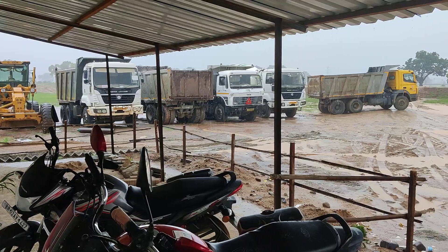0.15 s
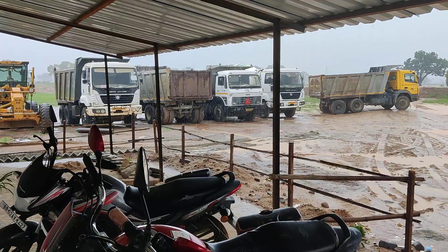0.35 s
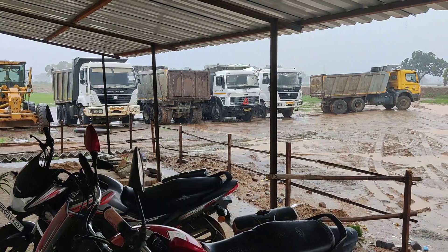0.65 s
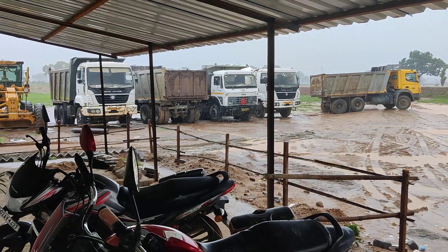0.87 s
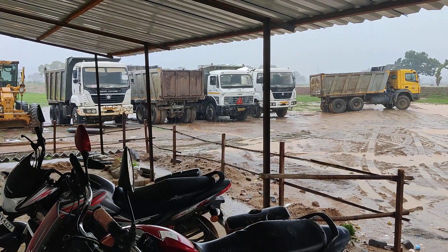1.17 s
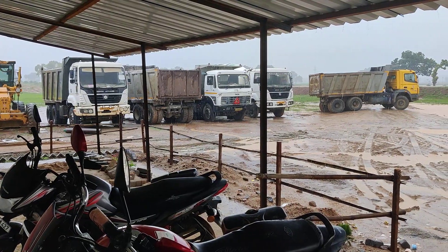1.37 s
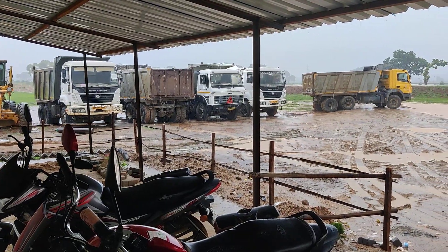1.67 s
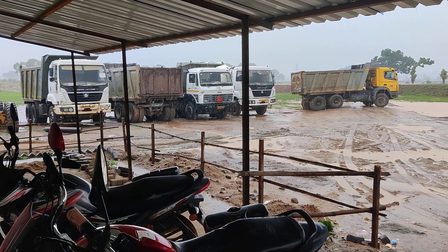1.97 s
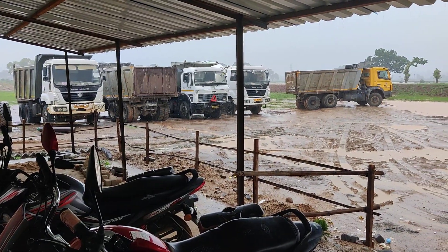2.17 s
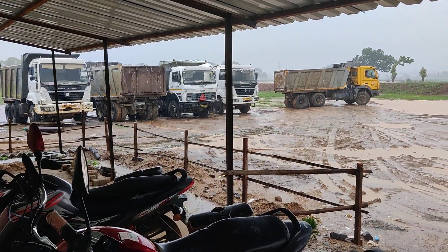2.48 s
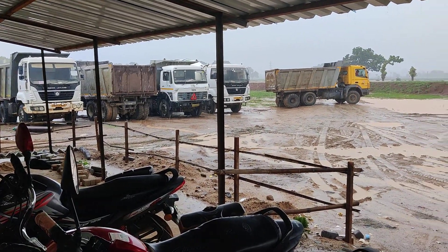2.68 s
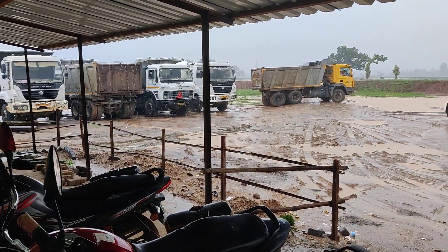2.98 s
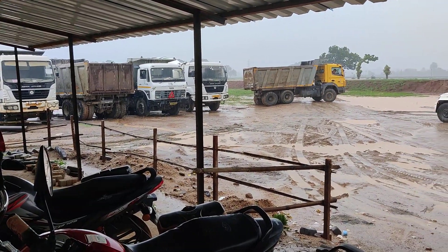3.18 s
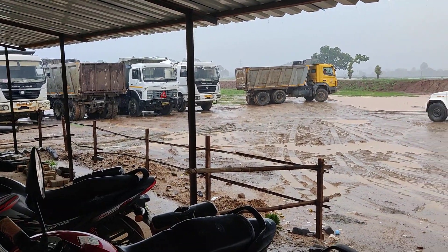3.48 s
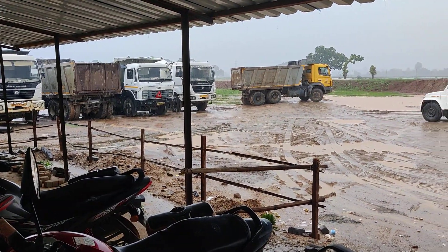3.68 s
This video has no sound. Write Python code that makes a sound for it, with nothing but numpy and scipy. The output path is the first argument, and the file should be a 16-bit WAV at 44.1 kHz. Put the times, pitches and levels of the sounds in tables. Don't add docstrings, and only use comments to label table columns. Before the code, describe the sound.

Steady rain fades in over the first half second, with a soft low thump near 0.35, then drums on a metal shed roof and hisses across a muddy yard. A distant diesel drones low, shifts to a lower pitch around 0.8-1.1, holds, then coasts down and fades from 2.4 to 4, beside a faint idling engine and rumble. Close drops tick and fizz, clearest around 1.4-1.6. Wide phone stereo.

```python
import sys
import numpy as np
from scipy import signal
from scipy.fft import rfft, irfft
from scipy.io import wavfile
from scipy.ndimage import uniform_filter1d

SR = 44100
rng = np.random.default_rng(int(sys.argv[2]) if len(sys.argv) > 2 else 0)


def unload_wav(signal):
    wavfile.write(
        sys.argv[1],
        SR,
        np.round(np.clip(np.atleast_2d(signal).T, -1, 1) * 32767).astype(np.int16),
    )


def elevation(decibels):
    levels = np.asarray(decibels, float)
    return 10 ** (levels / 20)


N = 169344
OPPOSED = np.array([[1], [-1]])


def level(x, db):
    return x * elevation(db) / np.sqrt(np.mean(x ** 2))


def along(table, hz):
    table = np.array(table, float)
    return np.interp(np.log(np.maximum(hz, 1)), np.log(table[:, 0]), table[:, 1])


def walk(rate_hz):
    hold = int(SR / rate_hz)
    steps = np.repeat(rng.standard_normal(N // hold + 1), hold)
    return 1.155 * uniform_filter1d(uniform_filter1d(steps, hold), hold)[:N]


def patter():
    drops_per_s, spread_db, tail_s, burst_share = 2500, 2, 0.0025, 0.58
    size = np.minimum(rng.exponential(size=N), 2.5)
    hit = (rng.random(N) < drops_per_s / SR) * elevation(spread_db * size)
    burst = signal.lfilter([1], [1, -np.exp(-1 / (tail_s * SR))], hit ** 2)
    power = 1 - burst_share + burst_share * burst / burst.mean()
    return rng.standard_normal(N) * np.sqrt(power)


def rain():
    # (frequency [Hz], density [dB per Hz])
    wash = [(200, -4), (640, -6.5), (2000, -2), (4000, -9.5), (4500, -13.5), (6800, -14), (7500, -19.5),
            (15700, -24.5)]
    # (frequency [Hz], width [Hz], gain [dB])
    left_peaks = [(452, 150, 6.5), (766, 50, 6), (1040, 270, 5), (1760, 810, 3.5), (2390, 1100, -2.5),
                  (3410, 590, 3.5), (5000, 950, 4), (6500, 1000, 1.5)]
    right_peaks = [(434, 120, 4.5), (756, 30, 6.5), (1040, 330, 3.6), (1856, 120, 2.6), (2634, 280, 3.7),
                   (3360, 160, 4.2), (4000, 160, 2.7), (6300, 1200, 0.85), (13200, 3000, 1.8)]
    # (frequency [Hz], correlation [-1..1])
    likeness = [(60, 0.99), (130, 0.5), (290, 1), (640, 0.61), (1410, -0.17), (3100, 0.03), (6820, -0.0),
                (15000, -0.18)]
    # (frequency [Hz], level difference [dB])
    tilt = [(60, 1.5), (110, 1.5), (200, 2.5), (380, -1.5), (700, 1.0), (1290, -3.5), (2380, -3.5),
            (4400, -5.5), (8120, 1), (15000, -2)]
    rain_db, swell_db, flicker_db = -26.5, 0.49, 1.03

    hz = np.fft.rfftfreq(N, 1 / SR)
    like = along(likeness, hz)
    mid = rfft(patter()) * np.sqrt(1 + like)
    side = rfft(patter()) * np.sqrt(1 - like)
    low_cut_db = 30 * np.clip(np.log2(200 / np.maximum(hz, 1)), 0, 3)
    colour_db = along(wash, hz) - low_cut_db
    pair = []
    for sign, peaks in ((0.96, left_peaks), (-1.067, right_peaks)):
        bumps_db = sum(db / (1 + (2 * (hz - f) / w) ** 2) for f, w, db in peaks)
        gain_db = colour_db + bumps_db + sign * along(tilt, hz) / 2
        pair.append((mid + sign * side) * elevation(gain_db))
    pair = np.array(pair)

    out = 0
    swell = swell_db * walk(2.04)
    octave = np.log2(np.maximum(hz, 1) / 125)
    for k in range(8):
        band = np.cos(np.pi / 2 * np.clip(octave - k, -1, 1)) ** 2
        flicker = flicker_db * k / 7 * walk(13)
        out = out + irfft(pair * band, N) * elevation(swell + flicker)
    return level(out, rain_db)


def truck():
    # (time [s], firing rate [Hz], second-order level [dB], first-order level [dB])
    drive = [(.1, 50.4, -23, -24), (.33, 50.51, -20.5, -22), (.55, 50.35, -22.5, -26),
             (.76, 50.63, -22, -30), (.85, 47.8, -40, -32), (.98, 44.8, -37, -28.5),
             (1.1, 45.3, -23, -26.5), (1.4, 44.84, -26, -26.5), (1.7, 44.35, -26.5, -28.5),
             (1.981, 44.37, -24.5, -26), (2.3, 44.08, -27, -28.5), (2.45, 41.56, -38, -36),
             (2.75, 35.98, -30.5, -40), (3.05, 32.31, -38, -49), (3.298, 28.97, -33, -44),
             (3.6, 24.42, -36, -42), (3.84, 22.5, -39, -46)]
    # (multiple of firing rate, level [dB])
    upper_orders = [(1.5, -42.5), (3, -41), (3.5, -49.5), (4, -51.5), (5, -60)]
    scatter_db, patchy_db, pitch_wobble = 1, 2, .002
    coast_s, coast_db = 2.3, 3

    t = np.arange(N) / SR
    time_s, firing_hz, second_db, first_db = np.array(drive).T
    rate_hz = np.interp(t, time_s, firing_hz) * (1 + pitch_wobble * walk(5.52))
    phase = 2 * np.pi * np.cumsum(rate_hz) / SR

    def order(multiple, db):
        tone = np.cos(multiple * phase + 2 * np.pi * rng.random())
        return np.sqrt(2) * elevation(db + scatter_db * walk(20)) * tone

    out = order(2, np.interp(t, time_s, second_db)) + order(1, np.interp(t, time_s, first_db))
    coast = coast_db * np.clip((t - coast_s) / 0.32, 0, 1)
    for multiple, db in upper_orders:
        out = out + order(multiple, db + patchy_db * walk(5.94) + coast)
    return out


def idling_engine():
    # (multiple of idle rate, level re fundamental [dB])
    idle_orders = [(1, -1), (2.3, -5), (5.6, -12.5), (8.3, -16)]
    idle_hz, idle_db, scatter_db = 30.45, -38, 1
    phase = 2 * np.pi * np.cumsum(idle_hz * (1 + .01 * walk(3))) / SR
    out = 0
    for multiple, db in idle_orders:
        order_db = idle_db + db + 3 * walk(5.06) + scatter_db * walk(20)
        tone = np.cos(multiple * phase + 2 * np.pi * rng.random())
        out = out + np.sqrt(2) * elevation(order_db) * tone
    return out


def rumble():
    # (frequency [Hz], density [dB per Hz])
    rumble_spectrum = [(5, -8), (15, -8), (30, -3.5), (60, -1.5), (100, 0), (175, -3.5), (210, -18),
                       (400, -37.5)]
    hz = np.fft.rfftfreq(N, 1 / SR)
    air = irfft(rfft(rng.standard_normal((2, N))) * elevation(along(rumble_spectrum, hz)), N)
    return level(air[0] + 0.09 * air[1] * OPPOSED, -34.5)


def engines():
    pan_db = 1.9
    return (truck() + idling_engine() + rumble()) * elevation(OPPOSED * pan_db / 2)


def splashes():
    # (time [s], peak [dB], lowest [Hz], highest [Hz], tail [s])
    drops = [(.269, -25.5, 5500, 12500, 0.018), (.456, -30, 12000, 16000, .01),
             (0.464, -27, 12000, 16000, .006), (.472, -31, 11500, 16000, .008),
             (.650, -27, 8500, 16000, 0.0022), (.653, -25, 11000, 16000, 0.01),
             (1.194, -29, 8000, 16000, 0.01), (1.359, -30, 5510, 12000, .01),
             (1.42, -20, 3500, 7000, 0.011), (1.487, -29, 5000, 14000, 0.015),
             (1.607, -22, 5990, 16000, .0015), (1.6094, -22, 8000, 16000, .0015),
             (1.612, -22, 4500, 15900, 0.027), (1.62, -34, 8500, 9100, .04), (1.66, -30, 9000, 16000, .02),
             (2.428, -23, 4500, 7500, .01), (2.83, -29, 8000, 15000, .008), (2.92, -30, 9000, 16000, 0.012),
             (2.961, -29, 4494, 8500, 0.022), (3.11, -39, 8000, 14000, .015),
             (3.352, -33, 7950, 16000, .03), (3.5, -29, 7000, 13000, .015),
             (3.592, -31, 9000, 16000, 0.039), (3.63, -31, 10980, 16000, 0.13)]
    click_db, click_s, crackle_db, hold = -4, .0006, 2.5, 64
    out = np.zeros((2, N))
    t = np.arange(int(.3 * SR)) / SR
    for time_s, peak_db, low_hz, high_hz, tail_s in drops:
        shape = np.exp(-t / tail_s) + elevation(click_db) * np.exp(-t / click_s)
        grains = np.repeat(rng.standard_normal(len(t) // hold + 1), hold)[:len(t)]
        crackle = elevation(crackle_db * (grains - .6))
        noise = rng.standard_normal((2, len(t))) * shape * crackle
        band = signal.butter(2, [low_hz, high_hz], "band", fs=SR, output="sos")
        fizz = signal.sosfilt(band, noise) * elevation(peak_db - 3)
        i = int(time_s * SR)
        out[:, i:i + len(t)] += fizz[:, :N - i]
    return out


def scene():
    return rain() + engines() + splashes()


def roll_off(x):
    return signal.sosfilt(signal.butter(12, 15840, fs=SR, output="sos"), x)


def record(dry):
    treble_hz, treble_held_db, treble_opens_s = 4000, -0.5, 0.24
    top_hz, thin_hz = 15840, 85
    thump_s, thump_db, thump_length_s = .335, -26, 0.03
    fade_start_s, fade_end_s, fade_power = 0.09, 0.52, 0.87

    t = np.arange(N) / SR
    high = signal.butter(1, treble_hz, "high", fs=SR, output="sos")
    treble = signal.sosfiltfilt(high, dry)
    dry = dry - (1 - elevation(treble_held_db)) * (t < treble_opens_s) * treble
    dry = signal.sosfilt(signal.ellip(8, .2, 60, top_hz, fs=SR, output="sos"), dry)

    deep = signal.sosfiltfilt(signal.butter(1, thin_hz, "low", fs=SR, output="sos"), dry)
    shut = 1 - np.clip((t - thump_s) / 0.017, 0, 1)
    after = np.maximum(t - thump_s, 0) / thump_length_s
    thump = elevation(thump_db) * after * np.exp(1 - after)
    fade = np.clip((t - fade_start_s) / (fade_end_s - fade_start_s), 0, 1) ** fade_power
    return roll_off((dry - shut * deep) * fade + thump)


dry = scene()
out = record(dry)
unload_wav(out)
```